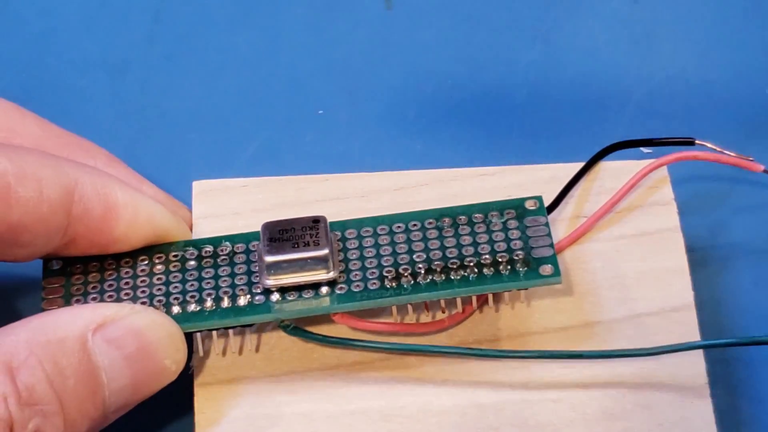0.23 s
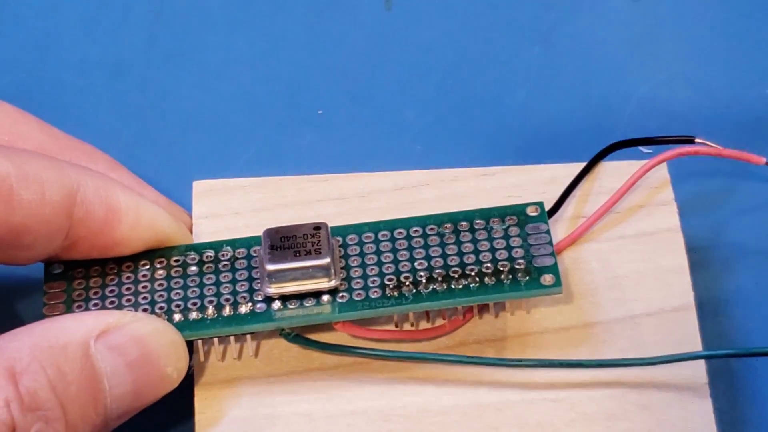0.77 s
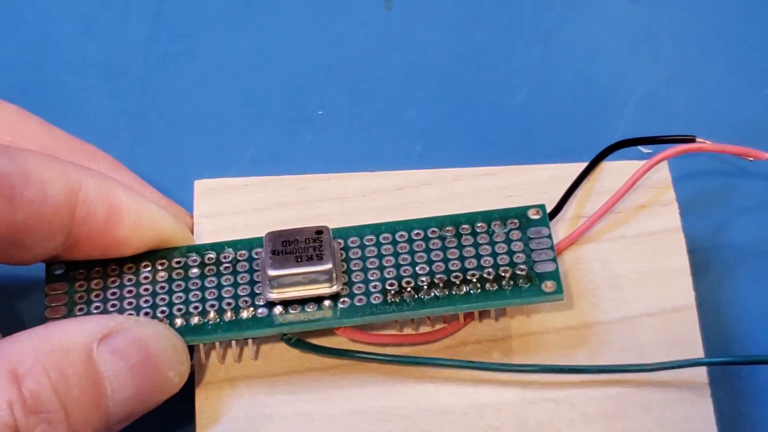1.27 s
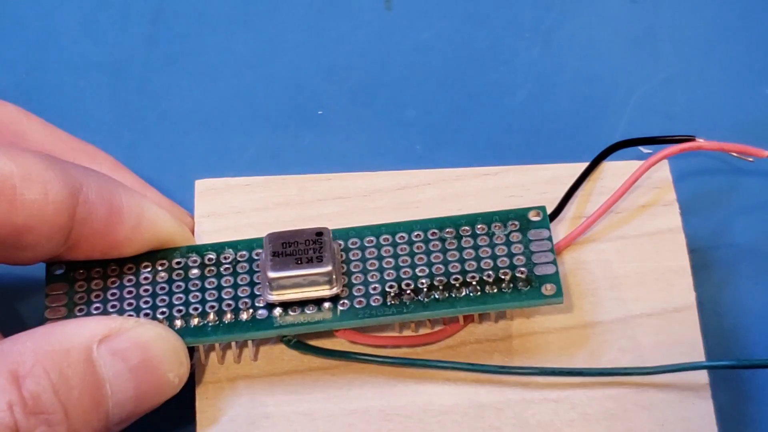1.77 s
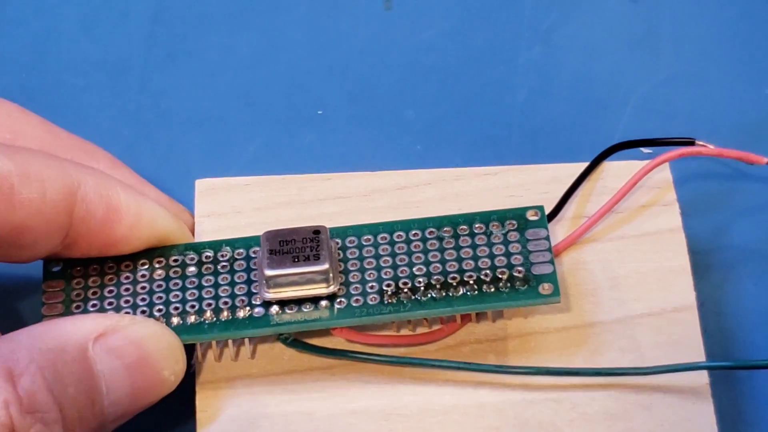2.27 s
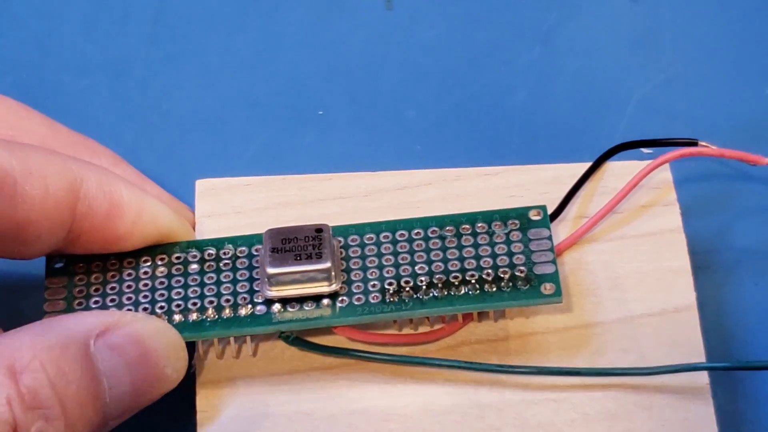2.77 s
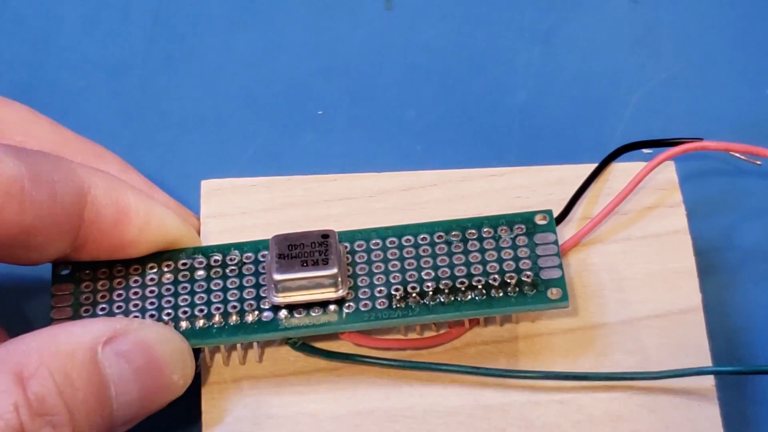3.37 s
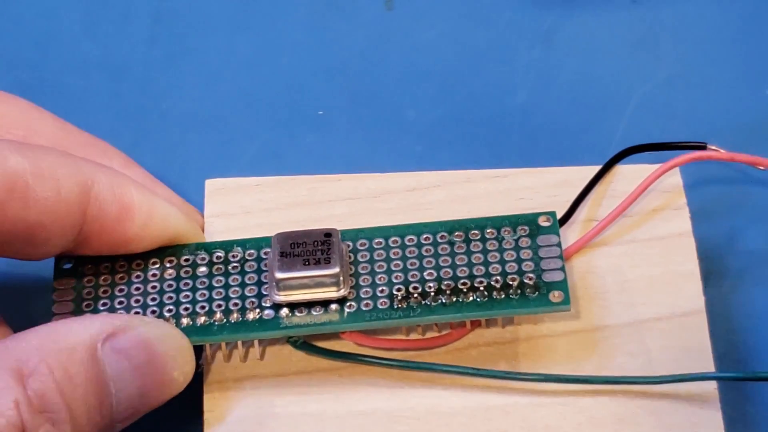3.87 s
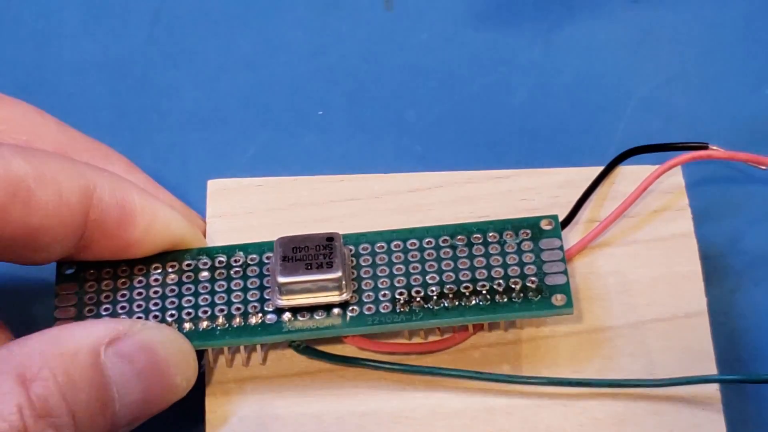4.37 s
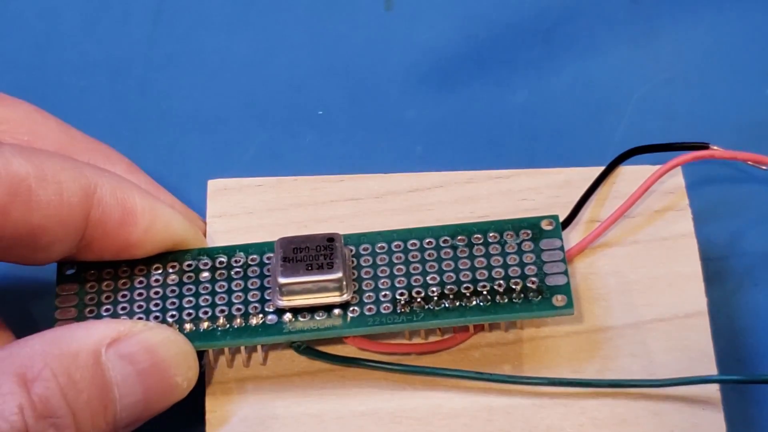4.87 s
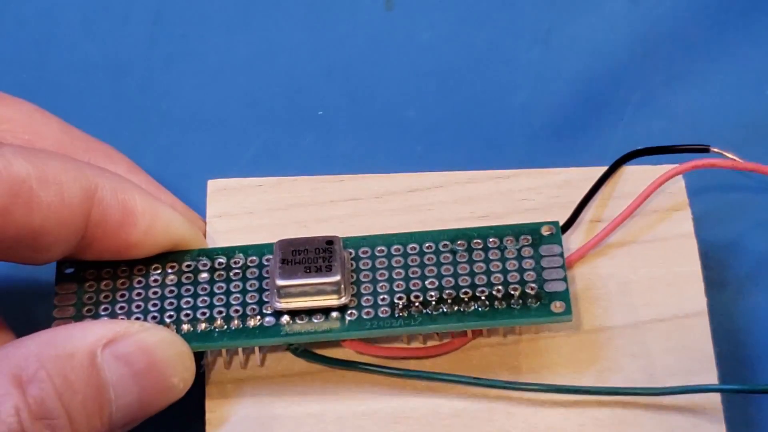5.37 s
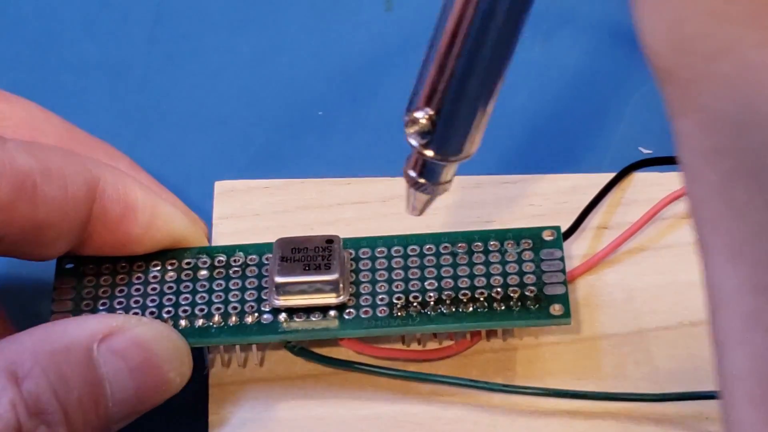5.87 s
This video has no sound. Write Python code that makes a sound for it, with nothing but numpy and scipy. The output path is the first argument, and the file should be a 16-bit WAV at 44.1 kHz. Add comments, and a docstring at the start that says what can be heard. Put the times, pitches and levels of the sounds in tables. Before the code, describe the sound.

A spring-loaded desoldering pump is cocked and fired three times, making pairs of sharp clicks and snaps, close by in a quiet room.

```python
"""Fingers rub and a circuit board knocks on a sliding wooden block, over the faint hum of a small room.
Then, close by, a spring-loaded desoldering pump is cocked and fired three times. Friction makes the
plunger scrape down the barrel until it latches; the trigger releases the spring, and the plunger slams
back with a puff of air. Each impact excites the barrel's damped modes and a short reverberation."""
import sys
import numpy as np
from scipy import signal
from scipy.fft import rfft, irfft
from scipy.io import wavfile

SR = 44100
rng = np.random.default_rng(int(sys.argv[2]) if len(sys.argv) > 2 else 0)


def to_wav(s):
    """Save 16-bit WAV."""
    ch = np.atleast_2d(s).T  # columns
    pcm = np.round(np.clip(ch, -1, 1) * 32767)  # PCM
    wavfile.write(sys.argv[1], SR, pcm.astype(np.int16))


N = 269704
T = np.arange(SR // 2) / SR  # time axis of one short event, in seconds


def amp(db):
    """Converts decibels to an amplitude ratio."""
    return 10 ** (np.asarray(db) / 20)


def unit(x):
    """Normalises a signal to unit energy."""
    return x / np.sqrt(np.sum(x ** 2) + 1e-20)


def read(points, hz):
    """Interpolates a table on a logarithmic frequency axis."""
    f, value = np.transpose(points)
    return np.interp(np.log(hz + 1), np.log(f + 1), value)


def add(mix, s, sound):
    """Superposition: adds a sound to the mix at s seconds."""
    part = mix[max(round(s * SR), 0):][:len(sound)]
    part += sound[:len(part)]


def colour(x, points, size=4096):
    """Minimum-phase filtering by a curve of (Hz, dB) points."""
    hz = abs(np.fft.fftfreq(size, 1 / SR))
    log_gain = np.log(amp(np.maximum(read(points, hz), -100)))
    response = np.exp(np.conj(signal.hilbert(log_gain)))
    taps = np.fft.ifft(response).real[:size // 2]
    return signal.fftconvolve(x, taps)[:len(x)]


def fade(t60):
    """Exponential damping: the amplitude falls 60 dB in t60 seconds."""
    return np.exp(-np.log(1000) * T / t60)


def ring(modes):
    """Free vibration: a sum of damped modes, neighbours starting in opposite directions."""
    return sum((-1) ** k * amp(db) * fade(t60) * np.sin(2 * np.pi * hz * T)
               for k, (hz, db, t60) in enumerate(modes))


def chatter(x, share, t60):
    """Secondary impacts: loose parts repeat a blow as a dying random rattle."""
    impacts = rng.standard_normal(len(T)) * rng.exponential(1, len(T))
    rattle = unit(impacts * fade(t60) * (1 - fade(t60 / 4)))
    return unit(x + share * signal.fftconvolve(x, rattle)[:len(T)])


# The room's steady noise. Each row: frequency in Hz, relative level in dB.
NOISE_SPECTRUM = [(12, -55.5), (20, -20.5), (44, -10.5), (101, -3.5), (130, -9), (241, -6.5), (328, -13.5),
                  (367, -15), (499, -17.5), (590, -18), (1480, -25), (2390, -31.5), (4300, -32),
                  (9400, -28.5), (12500, -41.5), (16000, -46)]
# Its width. Each row: frequency in Hz, side gain in dB.
NOISE_WIDTH = [(100, -32), (500, -19), (8000, -18)]
# The hum. Each row: frequency in Hz, rms level in dB.
HUM_LINES = [(60, -77.5), (102, -71), (240, -80.5), (370, -81), (600, -88.5), (1440, -89), (9598, -90.5)]
# The balance of noise and hum. Each row: frequency in Hz, left minus right in dB.
BACKGROUND_LEAN = [(100, -.5), (240, -0.5), (480, -2), (950, -2.5), (1900, -1), (7500, -.5), (15000, 0.5)]

def background():
    """Broadband noise plus a line spectrum: a hum wavering in phase, all leaning slightly right."""
    t, hz = np.arange(N) / SR, np.fft.rfftfreq(N, 1 / SR)
    spectrum = amp(read(NOISE_SPECTRUM, hz))
    mid, side = (np.sqrt(N) * unit(irfft(rfft(rng.standard_normal(N)) * spectrum, N)) for _ in range(2))
    side = colour(side, NOISE_WIDTH)
    waver = np.interp(t, np.linspace(0, t[-1], 30), rng.standard_normal(30))
    hum = sum(np.sqrt(2) * amp(db) * np.sin(2 * np.pi * (f * t + rng.random()) + .48 * waver)
              for f, db in HUM_LINES)
    pair = hum + amp(-65.5) * (mid + np.array([side, -side]))
    balance = amp(np.outer([.5, -.5], read(BACKGROUND_LEAN, hz)))
    return irfft(rfft(pair) * balance, N)


# The room's decay. Each row: frequency in Hz, t60 in seconds.
REVERB_TIMES = [(100, .22), (400, .2), (1500, .18), (3000, .18), (6000, .19), (10000, .19), (16000, .19)]
# The colour of its tail. Each row: frequency in Hz, gain in dB.
REVERB_SPECTRUM = [(100, 1.5), (300, 4), (1000, 5), (1800, -3.5), (2300, -1), (2850, -0.5), (3600, 6),
                   (5500, -5), (8000, 0), (10000, 3.5), (12500, 3), (15000, 3.5)]
# Echoes from bench and near walls. Each row: delay in seconds, relative gain.
REFLECTIONS = [(.0019, .13), (.0044, .17), (.0078, .15), (0.016, .08)]

def room(x, wet_db):
    """Reverberation: near reflections, scatter from the cluttered bench, then a short diffuse tail."""
    hz, t, noise = signal.stft(rng.standard_normal(len(T)), SR, nperseg=256)
    decay = np.exp(-np.log(1000) * t / read(REVERB_TIMES, hz)[:, None])
    tail = signal.istft(noise * decay, SR, nperseg=256)[1][:len(T)]
    scatter, build_up = 1 + .44 * fade(.17), 1 - fade(.0071)
    response = colour(unit(tail * scatter * build_up), REVERB_SPECTRUM)
    for s, gain in REFLECTIONS:
        add(response, s, np.array([2 * gain]))
    return x + amp(wet_db) * signal.fftconvolve(x, response)[:len(x)]


def friction(size, spectrum, grain):
    """Friction noise of unit rms: a dense run of tiny slips, a few larger as grain rises."""
    slips = rng.standard_normal(size) * (1 + grain * rng.exponential(1, size) ** 2)
    return np.sqrt(size) * unit(colour(slips, spectrum))


def stroke(length, spectrum, grain, uneven_db=2, uneven_s=.02):
    """Amplitude modulation of friction: a slide swells and dies away under uneven pressure."""
    progress = np.linspace(0, 1, max(int(length * SR), 64))
    uneven = np.interp(progress * length / uneven_s, np.arange(100), rng.standard_normal(100))
    pressure = np.sin(np.pi * progress ** .7) * amp(uneven_db * uneven)
    return np.sqrt(len(progress)) * unit(friction(len(progress), spectrum, grain) * pressure)


# Fingertip slides. Each row: start in seconds, length in seconds, level in dB.
FINGER_RUBS = [(0.029, 0.17, -65.5), (.19, .16, -67.5), (0.368, .24, -71), (.765, .13, -68.5),
               (0.98, 0.097, -60.5), (1.077, 0.15, -76), (1.256, 0.22, -73.5), (1.504, 0.13, -73),
               (4.003, 0.062, -65.5), (5.062, 0.059, -65), (5.098, 0.3, -73.5)]
# The hiss of skin. Each row: frequency in Hz, relative level in dB.
SKIN_SPECTRUM = [(900, -51.5), (1800, -12.5), (3200, -10.5), (4500, -3), (7000, 0), (10000, -9),
                 (13000, -16.5), (16000, -20.5)]

def rubbing():
    """Fine-grained sliding friction: fingertips hiss on board and tool."""
    out = np.zeros(N)
    for s, length, db in FINGER_RUBS:
        add(out, s, amp(db) * stroke(length, SKIN_SPECTRUM, grain=.084))
    return room(out, wet_db=-9)


# Low handling rustles. Each row: start in seconds, length in seconds, level in dB.
HANDLING_RUSTLES = [(0, 0.78, -65.5), (3.631, 0.13, -65.5), (5.268, 0.12, -66), (6.041, 0.105, -78)]
# Their colour. Each row: frequency in Hz, relative level in dB.
RUSTLE_SPECTRUM = [(88, -27), (150, 1.5), (835, -5.5), (996, -8.5), (1260, -12), (1960, -8), (3620, -24),
                   (5000, -16.5), (6500, -35.5), (11000, -120)]

def rustling():
    """Coarse-grained friction: the block slides, and a thumb rubs the trigger before the second shot."""
    out = np.zeros(N)
    for s, length, db in HANDLING_RUSTLES:
        add(out, s, amp(db) * stroke(length, RUSTLE_SPECTRUM, grain=.43))
    return out


# Knocks of the board. Each row: start in seconds, level in dB, treble gain in dB.
BOARD_KNOCKS = [(0.0669, -26.5, 13), (.143, -29.5, -10), (.177, -16.5, 9), (.347, -20.5, 3), (.444, -19, 0),
                (.846, -24.5, 7), (4.0809, -16, 6), (5.4065, -23, -4)]
# The response of the board on its block. Each row: frequency in Hz, relative level in dB.
BOARD_SPECTRUM = [(100, -20.5), (220, -10.5), (380, 4.5), (550, -4.5), (800, -8.5), (1100, -4), (1500, 1.5),
                  (2000, 1), (2800, -9.5), (3600, -20.5), (6000, -16.5), (9000, -33), (14000, -49)]

def knocking():
    """Impulse response: the board strikes the block and rattles, and the block slides a little."""
    out = np.zeros(N)
    for s, db, treble_db in BOARD_KNOCKS:
        knock = colour(signal.unit_impulse(len(T)), BOARD_SPECTRUM)
        knock = unit(colour(knock, [(2000, 0), (5000, treble_db)]))
        add(out, s, amp(db) * room(chatter(knock, share=.81, t60=.014), wet_db=-4))
        add(out, s, amp(-67.5) * stroke(length=.11, spectrum=RUSTLE_SPECTRUM, grain=.4))
    return out


# Squeaks of the grip. Each row: start in seconds, level in dB, pitch in Hz, t60 in seconds.
GRIP_SQUEAKS = [(5.08, -34, 5300, .05), (5.952, -33.5, 6630, .012)]

def squeaking(pair_ratio=1.086, mode_t60=.01):
    """Random excitation of two close modes: a tiny squeak as the grip on the pump shifts."""
    out = np.zeros(N)
    for s, db, hz, t60 in GRIP_SQUEAKS:
        tones = unit(ring([(hz, 0, mode_t60), (hz * pair_ratio, -1, mode_t60)]))
        add(out, s, amp(db) * room(chatter(tones, share=3, t60=t60), wet_db=-15))
    return out


# The pump's barrel. Each row: frequency in Hz, level in dB, t60 in seconds.
BARREL_MODES = [(1380, -14.5, 0.0066), (1768, -13.5, 0.017), (2473, -6, 0.011), (2795, 1.5, 0.008),
                (3485, 0.5, 0.0018), (3920, -2.5, 0.004), (5110, -5, 0.0093), (5037, -1.5, 0.0071),
                (6160, -10, 0.0027), (6880, -10.5, 0.0049), (7500, -15.5, 0.0027), (9220, -10.5, 0.01),
                (9900, -12.5, 0.0025), (10380, -16.5, 0.0033), (12900, -25, .003), (14830, -26.5, .003)]
# A contact's soft first touch, its grit, and the crack they form. Each row: frequency in Hz, gain in dB.
TOUCH_SPECTRUM = [(9500, 0), (12500, -7)]
GRIT_SPECTRUM = [(1000, -2.5), (4000, -0.5), (9500, 1), (12500, 5.5)]
CRACK_SPECTRUM = [(100, -12.5), (500, -10), (900, -14), (1450, -1.5), (1800, 0), (2200, -4.5), (2900, 2.5),
                  (3650, -6), (4900, 0.5), (6200, -1), (8300, -10.5), (10800, -10.5), (13000, -19),
                  (16000, -20.5)]

def click(bass_db, body_db, treble_db, top_db, crack_db, knock_db=0):
    """Impact excitation: a dry crack and the barrel's ring, coloured by the blow's place and hardness."""
    grit = .56 * colour(unit(rng.standard_normal(len(T)) * fade(t60=.008)), GRIT_SPECTRUM)
    touch = colour(signal.unit_impulse(len(T)), TOUCH_SPECTRUM)
    crack = unit(colour(grit + touch, CRACK_SPECTRUM))
    contact = [(20, bass_db - 28), (100, bass_db), (240, bass_db - 3), (450, bass_db),
               (700, bass_db + knock_db), (1050, bass_db + knock_db), (1450, body_db), (1900, body_db),
               (2800, 0), (3300, 0), (5000, treble_db), (9000, treble_db), (12500, top_db)]
    return unit(colour(unit(ring(BARREL_MODES)) + amp(crack_db) * crack, contact))


def tick(bright_db, bass_db):
    """Spectral tilt of a light impact: the brighter it is, the less body it has."""
    contact = click(bass_db, body_db=4 - .3 * bright_db, treble_db=bright_db,
                    top_db=1.6 * bright_db - 13.5, crack_db=13)
    return room(chatter(contact, share=.45, t60=.0093), wet_db=-3.5)


# Ticks of the pump. Each row: start in seconds, level in dB, brightness in dB.
HANDLING_TICKS = [(0.2862, -30, -3), (.308, -33, 5), (.6501, -29, 37), (0.896, -27.5, -6.5),
                  (1.804, -30.5, -2.5), (2.226, -29, -4), (2.2465, -33.5, -14), (2.7994, -32.5, -14),
                  (3.1944, -33, -1.5), (3.249, -31, 2), (3.318, -23, -12), (3.797, -26.5, -4),
                  (3.834, -30.5, 5), (3.8938, -28, 7), (4.363, -32, -22), (4.9912, -34.5, -6)]

def ticking():
    """Light impacts: parts touch inside the pump as it is handled."""
    out = np.zeros(N)
    for s, db, bright_db in HANDLING_TICKS:
        add(out, s, amp(db) * tick(bright_db, bass_db=-2.5))
    return out


# Plunger and spring scraping in the barrel. Each row: frequency in Hz, relative level in dB.
SCRAPE_SPECTRUM = [(590, -54.5), (1000, -11), (1230, 2.5), (1870, 0), (2320, 0), (3070, -2), (3560, -23),
                   (4070, 1.5), (4810, -12.5), (5920, -1.5), (6430, -6), (9650, -17), (12000, -38),
                   (15600, -65.5), (22000, -120)]
# The compressed spring, and the plunger's thud. Each row: frequency in Hz, level in dB, t60 in seconds.
TAUT_SPRING_MODES = [(2822, -41, .07), (2958, -42, .08), (3270, -42, .08), (3412, -44, .07),
                     (4360, -45, .09), (9160, -43, .12), (9340, -43, .12), (9620, -43, .12)]
THUD_MODES = [(255, 5.5, 0.035), (350, .5, .025)]
# Cockings. Each row: latch time and push length in seconds, thumb force in dB,
# lead of the catch and delay of the end stop in seconds, latch level and body gain in dB.
COCKING_STROKES = [(2.083, 0.33, -4.5, 0.042, 0.065, 10, -1.5),
                   (3.4797, .27, -0.5, .0431, 0.044, 10.5, -8.5),
                   (4.4482, .19, 1.5, .0282, 0.025, 10.5, -5.5)]

def cocking(rise_s=.027, sag_db=-4):
    """Friction, then impacts: the plunger scrapes, latches and bottoms out; the taut spring sings."""
    out = np.zeros(N)
    thud = ring(THUD_MODES)
    spring = ring(TAUT_SPRING_MODES) * (1 - fade(.01))
    for s, push, force_db, lead, overrun, db, body_db in COCKING_STROKES:
        t = T[T < push]
        # The scrape starts quickly and eases as the spring tightens.
        effort = np.minimum(t / rise_s, 1) * amp(force_db + sag_db * t / push)
        add(out, s - push, amp(-63.5) * effort * friction(len(t), SCRAPE_SPECTRUM, grain=.17))
        add(out, s - lead, amp(-17.5) * tick(bright_db=-4.5, bass_db=5))  # meets the catch
        add(out, s - lead / 2, amp(force_db - 29) * tick(bright_db=-12.5, bass_db=.5))  # slips over it
        latch = click(bass_db=-13, body_db=body_db, treble_db=-1.5, top_db=-4, crack_db=-2)
        snap = chatter(latch, share=.2, t60=.01)
        add(out, s, room(amp(db) * snap + amp(-.5) * spring + amp(-49) * thud, wet_db=-6))
        add(out, s + overrun, amp(force_db - 13) * tick(bright_db=4, bass_db=4))  # hits the end stop
        add(out, s + overrun, amp(force_db - 42.5) * room(thud, wet_db=-6))
    return out


# The slack spring. Each row: cluster centre in Hz, level in dB, t60 in seconds.
SLACK_SPRING_MODES = [(1300, -7, 0.85), (1300, -0.5, 0.94), (1459, -2, 0.96), (1530, -9.5, .6),
                      (1650, -1, 0.37), (1680, 0.5, 0.91), (1850, -0.5, 1), (1938, -6, .7),
                      (1970, -7, 0.37), (2121, -6.5, 0.53)]

def shiver(spread_hz=45):
    """Beating: the slack spring's densely clustered modes blur into a soft rasp."""
    t = np.arange(SR) / SR
    modes = [(hz + offset, db, t60) for hz, db, t60 in SLACK_SPRING_MODES
             for offset in rng.uniform(-spread_hz, spread_hz, size=6)]
    return sum(amp(db - 60 * t / t60) * np.sin(2 * np.pi * (hz * t + rng.random()))
               for hz, db, t60 in modes) / np.sqrt(12)


# The air in barrel and nozzle, and the bench. Each row: frequency in Hz, level in dB, t60 in seconds.
NOZZLE_MODES = [(252, -3, .07), (305, 0, .035), (420, -5, .025), (540, -3, .025)]
BENCH_MODES = [(62, 0, 0.089), (87.5, -2.5, .12)]
# Shots. Each row: slam time and squeeze length in seconds, trigger level in dB, flight in seconds,
# slam level and its bass, knock, body and treble gains in dB, rebound delay in seconds,
# rebound and room gains in dB, puff, spring and jolt levels in dB.
PUMP_SHOTS = [(2.326, .02, -30, .0026, 8.5, 3, 0.5, 7.5, 3.5, .0007, .5, -7, -51, -75, -33.5),
              (3.7028, 0.049, -26, .0025, 4.5, 0.5, 5.5, 3, 0, .0025, 5.5, -9, -42, -70.5, -57),
              (4.6744, .0362, -31.5, .0018, 8.5, -0.5, -3, 6, 3, 0.000685, -2, -7.5, -26.5, -53, -62)]

def firing(take_up_share=.55, recoil_delay_s=.0035):
    """Release of elastic energy: the plunger trips, slams and rebounds; air, spring and bench resonate."""
    out = np.zeros(N)
    for (s, squeeze, trigger_db, flight, db, bass_db, knock_db, body_db, treble_db,
         rebound, rebound_db, wet_db, puff_db, spring_db, jolt_db) in PUMP_SHOTS:
        # The trigger ticks when touched and again partway through the squeeze.
        add(out, s - squeeze, amp(-34) * tick(bright_db=-.5, bass_db=-3.5))
        add(out, s - take_up_share * squeeze, amp(trigger_db) * tick(bright_db=5, bass_db=0))
        trip, slam, bounce = (click(bass_db, body_db, treble_db, top_db=treble_db - 6,
                                    crack_db=2.5, knock_db=knock_db) for _ in range(3))
        add(out, s - flight, amp(db - 8.5) * room(chatter(trip, share=1.9, t60=.024), wet_db))
        add(out, s, amp(db) * room(chatter(slam, share=.55, t60=.016), wet_db))
        add(out, s + rebound, amp(db + rebound_db) * room(chatter(bounce, share=.45, t60=.018), wet_db))
        add(out, s, amp(puff_db) * room(ring(NOZZLE_MODES), wet_db=-9.5))
        add(out, s, amp(spring_db) * shiver())
        add(out, s + recoil_delay_s, amp(jolt_db) * ring(BENCH_MODES))
    return out


# A faint side signal. Each row: frequency in Hz, side gain in dB.
SIDE_GAINS = [(100, -38.5), (500, -25.5), (2000, -43), (5000, -45.5), (9000, -31.5), (14000, -21.5)]

def scene():
    """Mid-side stereo: a weak side signal in quadrature, shaped across frequency, is added to the centred mix."""
    mid = cocking() + firing() + ticking() + squeaking() + rubbing() + rustling() + knocking()
    width = amp(read(SIDE_GAINS, np.fft.rfftfreq(N, 1 / SR)))
    side = irfft(1j * rfft(mid) * width, N)
    return np.array([mid + side, mid - side]) + background()


def record(dry, ceiling=.95, cutoff_hz=15900):
    """Soft saturation rounds the loudest peaks; a low-pass filter then limits the band."""
    rounded = dry / (1 + (dry / ceiling) ** 4) ** .25
    low_pass = signal.firwin(511, cutoff_hz, window=("kaiser", 9), fs=SR)
    return signal.oaconvolve(rounded, low_pass[None], "same")


dry = scene()
out = record(dry)
to_wav(out)
```